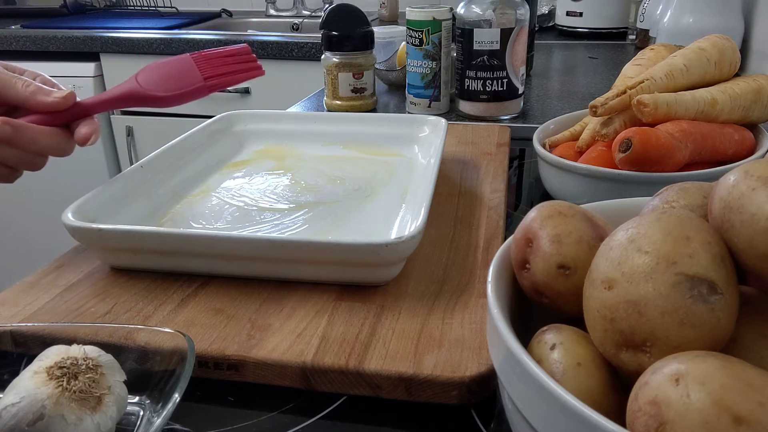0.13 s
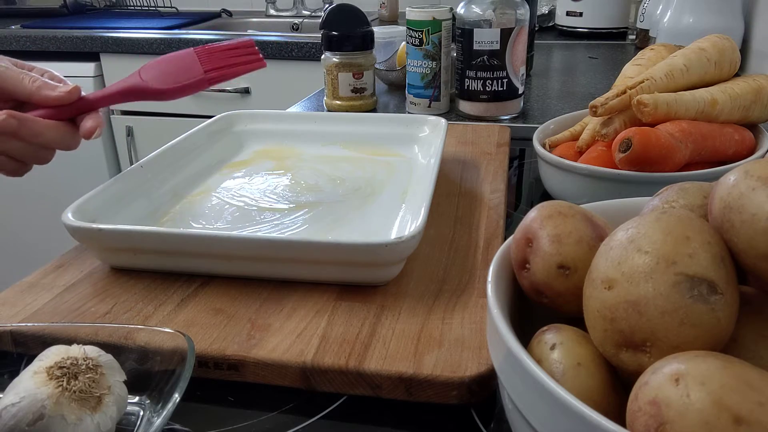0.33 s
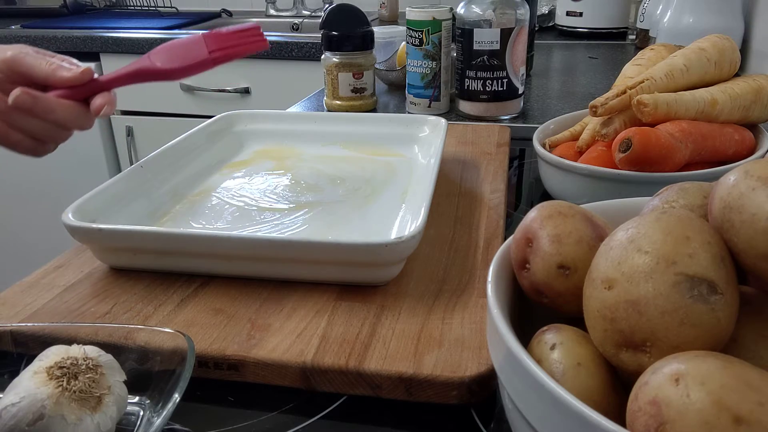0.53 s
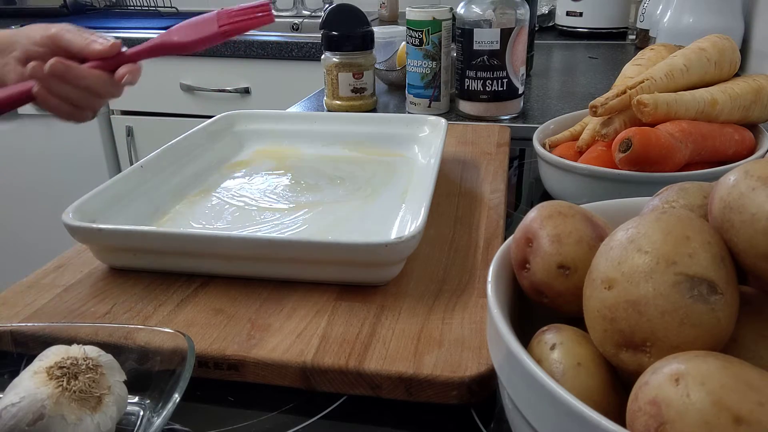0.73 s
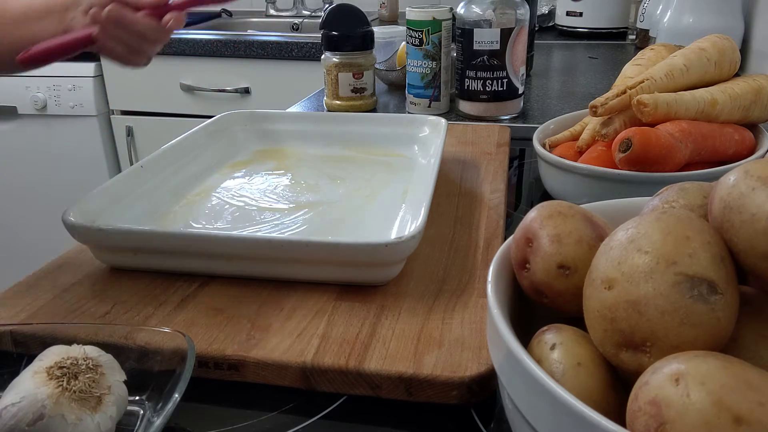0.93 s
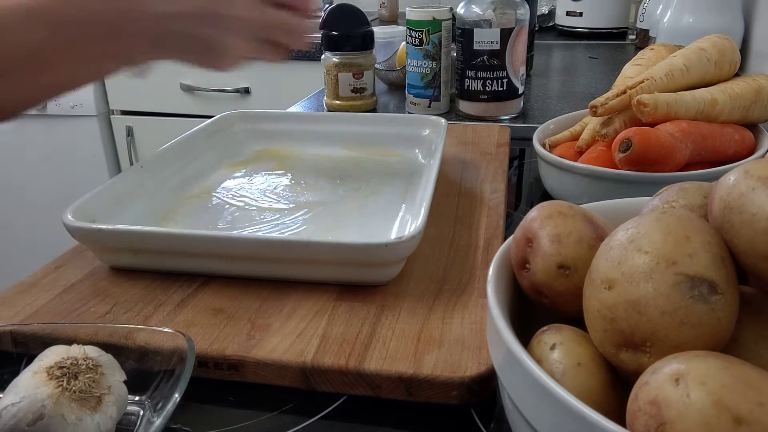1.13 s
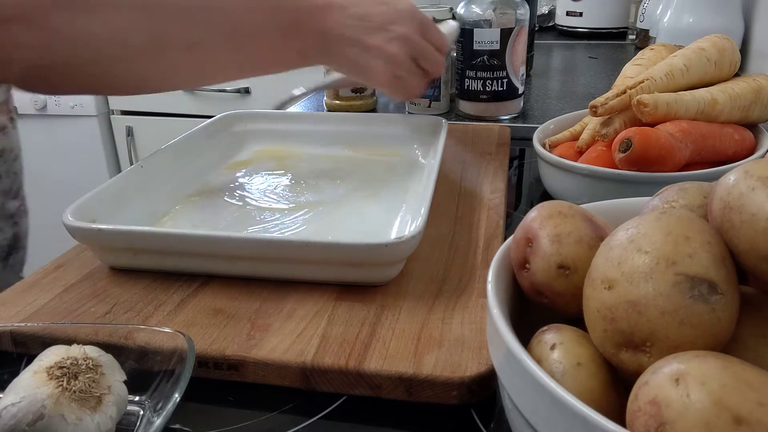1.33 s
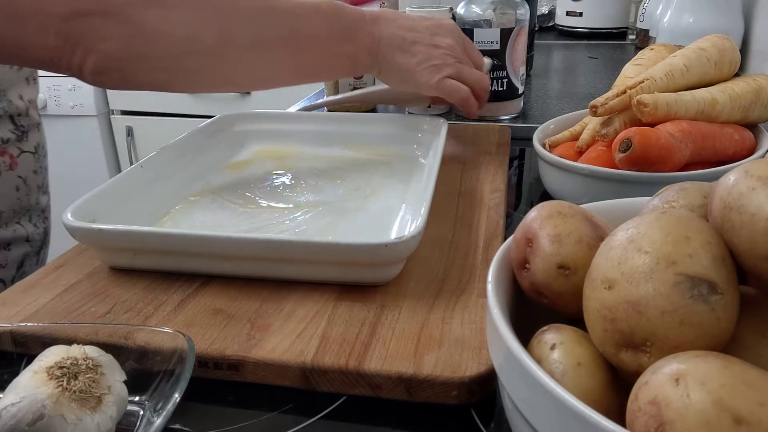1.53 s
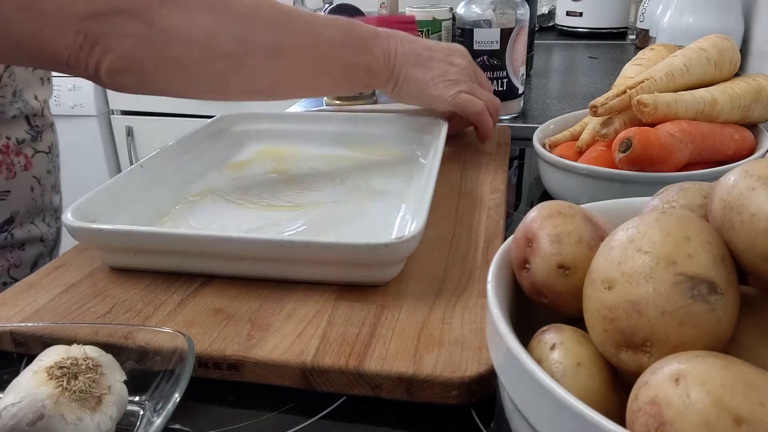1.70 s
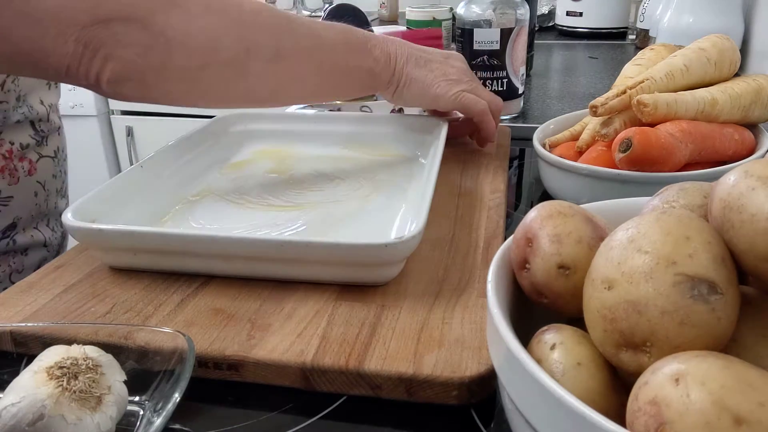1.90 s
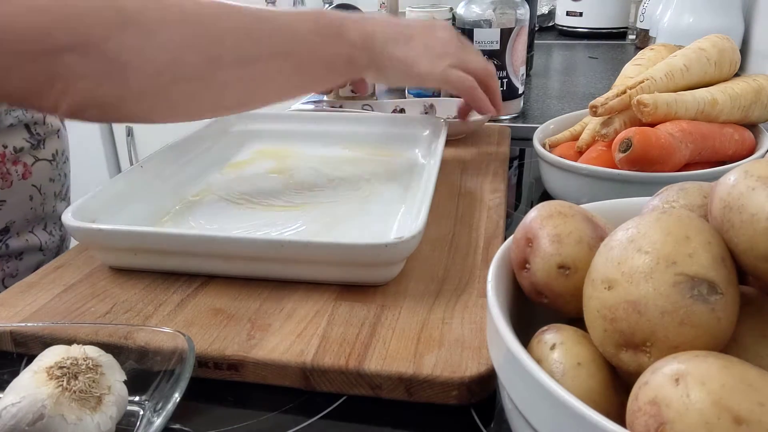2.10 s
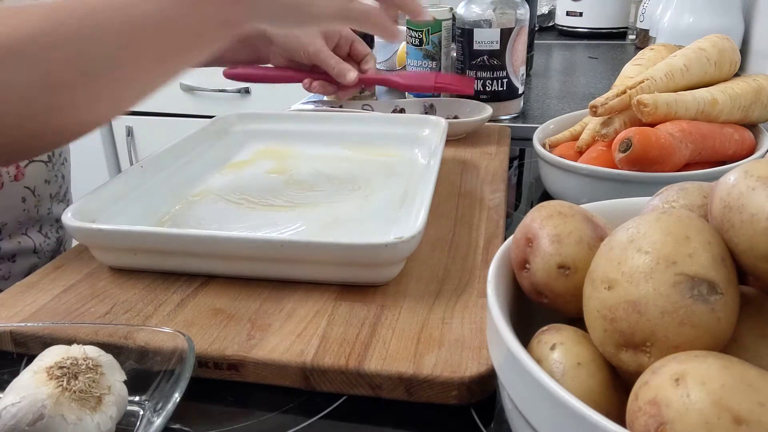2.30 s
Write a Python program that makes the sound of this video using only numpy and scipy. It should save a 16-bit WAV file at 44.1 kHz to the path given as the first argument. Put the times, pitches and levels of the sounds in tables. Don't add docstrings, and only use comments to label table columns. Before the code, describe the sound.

Hard knocks on a kitchen worktop: faint ticks and a shuffle, a loud ringing clatter at right, a pause, three brush taps on a small plate, the plate set down, soft footfalls; close stereo, fridge hum.

```python
import sys
import numpy as np
from scipy import signal
from scipy.fft import rfft, irfft, next_fast_len
from scipy.io import wavfile
from scipy.ndimage import uniform_filter1d, map_coordinates

SR = 44100
rng = np.random.default_rng(int(sys.argv[2]) if len(sys.argv) > 2 else 0)


def gain_from_db(level_db):
    decades = np.asarray(level_db, float) / 20
    return 10 ** decades


def output_pcm(signal):
    pcm = np.clip(np.atleast_2d(signal).T, -1, 1) * 32767
    wavfile.write(sys.argv[1], SR, np.round(pcm).astype(np.int16))


N = 103635
RIGHT_MS, AHEAD_MS = 0.485, 0.056


def unit(x):
    return x / np.sqrt(np.mean(x ** 2) + 1e-20)


def along(points, hz):
    f, v = np.transpose(points)
    return np.interp(np.log(hz + 1), np.log(f + 1), v)


def wobble(rate_hz):
    knots = rng.standard_normal(int(N * rate_hz / SR) + 4)
    return map_coordinates(knots, [np.arange(N) * rate_hz / SR])


def filtered(x, response):
    n = x.shape[-1]
    m = next_fast_len(n + SR // 4)
    return irfft(rfft(x, m) * response(np.fft.rfftfreq(m, 1 / SR)), m)[..., :n]


# pitch_hz, likeness [-1 to 1]
LIKENESS = [(60, 1), (240, 0.941), (950, 0.08), (3770, -0.113), (15000, -0.016)]


def rush(spectrum, patchy_db):
    z = signal.stft(rng.standard_normal((2, N)), nperseg=512)[2]
    patches = uniform_filter1d(rng.standard_normal(z.shape[1:]), size=6, axis=0)
    patches = uniform_filter1d(patches, size=10, axis=1)
    pair = signal.istft(z * gain_from_db(patchy_db * unit(patches)), nperseg=512)[1][:, :N]

    def colour_and_width(hz):
        angle = np.arccos(np.clip(along(LIKENESS, hz), -1, 1)) / 2
        return gain_from_db(along(spectrum, hz)) * np.array([np.cos(angle), np.sin(angle)])

    mid, side = filtered(pair, colour_and_width)
    return unit(np.array([mid + side, mid - side]))


# multiple of the shaft rate, level_db
FRIDGE_ORDERS = [(1, -5), (4, -2), (6, -23), (9, -2), (12, -7.5), (14, -4.5), (15, -2), (16, 2), (17, -2),
                 (18, -15), (19, -1.5), (23, -18.5)]


def fridge():
    t = np.arange(N) / SR
    shaft_hz, mains_hz = 33.69, 98.7
    orders = 0
    for multiple, level_db in FRIDGE_ORDERS:
        level = gain_from_db(level_db + 0.31 * wobble(1.43))
        phase = rng.uniform(0, np.pi) + rng.normal(0, 0.97, (2, 1))
        orders = orders + level * np.sin(2 * np.pi * multiple * shaft_hz * t + phase)
    drone_level = gain_from_db(-55 + 4.2 * wobble(8.24))
    drone = drone_level * np.sin(2 * np.pi * mains_hz * t + 2.14 * wobble(9.9))
    return gain_from_db(-61.5) * orders + drone


# start_s, level_db, brightness_db
MOVEMENTS = [(0, -60.5, -1.5), (.07, -50.5, -8.5), (.2, -59, 1), (.5, -59, -16), (.62, -60, 1.5),
             (.72, -61, 0), (.79, -65, -4), (1.1, -61, -3.5), (1.29, -66, -2.5), (1.325, -50.5, -7),
             (1.37, -52.5, -6.5), (1.43, -65.5, -3), (1.6, -65, -2.5), (2.35, -69.5, -1)]
# pitch_hz, level_db per Hz
CLOTH_COLOUR = [(500, -74), (1600, -1), (2200, 0), (4000, -1.5), (6500, -7.5), (16000, -53)]
SHEEN_COLOUR = [(4000, -45), (8000, -1), (11000, 0.5), (16000, -5.5)]


def rustle():
    start_s, *columns = np.transpose(MOVEMENTS)
    level_db, bright_db = [np.interp(np.arange(N) / SR, start_s, c) for c in columns]
    movement = gain_from_db(level_db + 1.2 * wobble(32.3))
    hiss = rush(CLOTH_COLOUR, patchy_db=0.5)
    sheen = gain_from_db(bright_db - 1) * rush(SHEEN_COLOUR, patchy_db=0.8)
    return movement * (hiss + sheen)


# pitch_hz, level_db per Hz
AIR_COLOUR = [(15, -25), (30, -4.5), (90, -2), (160, -4.5), (230, -11.5), (700, -12.5), (1100, -18),
              (16000, -51)]


def air():
    return gain_from_db(-53.5) * rush(AIR_COLOUR, patchy_db=2.5)


def pulse(tone, body, tilt_db, crack_db):
    hz = np.fft.rfftfreq(32768, 1 / SR)
    resonances = 0
    for pitch_hz, width_hz, level_db in body:
        resonances = resonances + gain_from_db(9.5 + level_db) / np.hypot(1, 2 * (hz - pitch_hz) / width_hz)
    resonances = gain_from_db(crack_db) + resonances
    colour_db = along(tone, hz) + tilt_db * np.log2((hz + 50) / 1000)
    cepstrum = irfft(np.log(np.maximum(gain_from_db(colour_db) * resonances, 1e-6)))
    cepstrum[1:16384] *= 2
    cepstrum[16385:] = 0
    p = irfft(np.exp(rfft(cepstrum)))[:16384]
    return p / np.linalg.norm(p)


# pitch_hz, t60_s
ROOM_DECAY = [(120, 0.35), (500, 0.27), (2000, 0.33), (6000, 0.37), (14000, 0.25)]


def kitchen(scatter_s, room_db, wall_db):
    n = SR // 2
    hz, t, z = signal.stft(rush([(20, 0)], patchy_db=-1)[:, :n], SR, nperseg=256)
    tail = signal.istft(z * gain_from_db(-60 * t / along(ROOM_DECAY, hz)[:, None]), SR, nperseg=256)[1][:, :n]
    tail = tail * np.clip(np.arange(n) / SR / 0.0012, 0, 1)
    f = np.fft.rfftfreq(n, 1 / SR)
    scatter_hz = 180.7
    both, left, right = [map_coordinates(k, [f / scatter_hz]) for k in rng.standard_normal((3, SR // 100))]
    alike = np.clip(along(LIKENESS, f / 3), 0, 1)
    delay = scatter_s * (np.sqrt(alike) * both + np.sqrt(1 - alike) * np.array([left, right])) ** 2
    near = irfft(np.exp(-2j * np.pi * np.cumsum(delay, axis=1) * f[1]), n)
    wall_s = .0085
    near = near + gain_from_db(wall_db) * np.roll(near[::-1], round(wall_s * SR), axis=1)
    near = near * (np.arange(n) < SR // 4)
    return near + gain_from_db(room_db) * tail / np.linalg.norm(tail[0])


def ringing(modes, tone, t):
    ring = 0
    for pitch_hz, level_db, t60_s in modes:
        excited_db = level_db + 0.2 * along(tone, pitch_hz) + rng.normal(0, 0.88, (2, 1))
        level = gain_from_db(excited_db - 60 * t / t60_s + 5.6 * wobble(62.6)[:len(t)])
        wander = pitch_hz / 3000 * wobble(53.7)[:len(t)]
        start_phase = rng.uniform(0, 2 * np.pi, (2, 1))
        ring = ring + level * np.sin(2 * np.pi * pitch_hz * t + wander + start_phase)
    return ring * (1 - np.exp(-t / 0.0018))


# pitch_hz, level_db, t60_s
DISH_MODES = [(861, 4.5, 0.29), (991, 2, .2), (2000, -10, 0.46), (2490, -5, 0.51), (2815, 2, 0.41),
              (3363, -1.5, 0.52), (3730, 5, 0.41), (3740, -3, 0.27), (4740, -3, 0.43), (5830, -12, 0.28)]


def knocks(events, tone, body, lag_ms, gain_db, modes=DISH_MODES, scatter_s=.003, room_db=-0.5,
           crack_db=0, wall_db=-16.5):
    out, t = np.zeros((2, N + SR)), np.arange(SR // 2) / SR
    lead_s = .001

    def to_ports(hz):
        delay_s = lead_s + np.array([[.5], [-.5]]) * lag_ms / 1000
        shade_db = -0.5 * lag_ms * np.array([[1], [-1]]) * np.log2(1 + hz / 500)
        return np.exp(-2j * np.pi * hz * delay_s) * gain_from_db(shade_db)

    for start_s, level_db, ring_db, tilt_db in events:
        strike = pulse(tone, body, tilt_db, crack_db)[None]
        blow = signal.fftconvolve(strike, kitchen(scatter_s, room_db, wall_db), axes=1)[:, :len(t)]
        both = gain_from_db(13 + gain_db) * blow + gain_from_db(ring_db - 8.5) * ringing(modes, tone, t)
        i = round((start_s - lead_s) * SR)
        out[:, i:i + len(t)] += gain_from_db(level_db) * filtered(both, to_ports)
    return out[:, :N]


# start_s, level_db, ring_db, tilt_db per octave
TICK_HITS = [
    (0.0187, -44.5, -24, 0.1),
    (0.0886, -42, -11, 0.1),
    (0.1433, -43.5, -34, 0.1),
]
# pitch_hz, level_db per Hz
TICK_COLOUR = [(800, -39), (3500, -10), (5000, -3), (7000, -5), (13000, -3.5), (16000, -14)]


def ticks():
    return knocks(TICK_HITS, TICK_COLOUR, [], RIGHT_MS, gain_db=5.0)


# start_s, level_db, ring_db, tilt_db per octave
SHUFFLE_HITS = [
    (.02, -39.5, -50, 0.44),
    (.053, -38, -44, 6.3),
    (.068, -40, -38, 4),
    (.1, -50, -29, 0.046),
    (.152, -39.5, -38, 2.1),
]
# pitch_hz, level_db per Hz
THUD_COLOUR = [(60, -25), (150, 4.5), (260, -0.5), (550, -1.5), (1200, -19.5), (3000, -60)]
# pitch_hz, width_hz, level_db
SHUFFLE_RESONANCES = [(360, 21, 4.5), (820, 46, -3), (1355, 45, 14)]


def shuffle():
    return knocks(SHUFFLE_HITS, THUD_COLOUR, SHUFFLE_RESONANCES, RIGHT_MS, gain_db=7.5, modes=[])


# start_s, level_db, ring_db, tilt_db per octave
SCUFF_HITS = [
    (.203, -44, -44, 0),
    (.207, -37.5, -34, -1),
    (.213, -38.5, -40, 0.5),
    (.222, -47, -34, -3),
]
# pitch_hz, level_db per Hz
TAP_COLOUR = [(47, -30), (80, -6.5), (167, 1.5), (528, -1), (638, -6.5), (1470, -4), (2240, -12),
              (3410, -10), (12000, -35), (15600, -89), (22000, -120)]
# pitch_hz, width_hz, level_db
SCUFF_RESONANCES = [(297, 16, 1.8), (623, 68, 1.6), (1940, 160, 2)]


def scuff():
    return knocks(SCUFF_HITS, TAP_COLOUR, SCUFF_RESONANCES, RIGHT_MS, gain_db=12)


# start_s, level_db, ring_db, tilt_db per octave
BUMP_HITS = [
    (0.241, -16, -19.5, -0.46),
    (.2455, -18, -30, -1.15),
]
# pitch_hz, level_db per Hz
CLATTER_COLOUR = [(50, -21), (100, -8.5), (250, -9), (1000, -7), (1460, -15), (2080, -7.5), (12800, -17),
                  (16000, -36)]
# pitch_hz, width_hz, level_db
BUMP_RESONANCES = [(98, 14, 2.7), (278, 22, 9.7), (397, 17, 7.7), (597, 20, 3), (777, 45, 5.3),
                   (1007, 50, 3.6), (2030, 26, 1.7), (2340, 97, 1.2), (3710, 31, 8), (4740, 40, 1.2)]


def bump():
    return knocks(BUMP_HITS, CLATTER_COLOUR, BUMP_RESONANCES, RIGHT_MS, gain_db=5.0, crack_db=-0.5)


# start_s, level_db, ring_db, tilt_db per octave
CLATTER_HITS = [
    (0.305, -8, -26.5, 0.38),
    (.3075, -12.5, -29.5, -0.2),
    (.327, -28, -23, -2),
]
# pitch_hz, width_hz, level_db
CLATTER_RESONANCES = [(205, 33, 11), (296, 27, 3), (357, 20, 8.5), (570, 10.7, 12.5), (982, 44, 7.5),
                      (2050, 78, 5.5), (2330, 150, 4), (3170, 81, 6), (3790, 67, 3.5), (3950, 130, 1),
                      (4880, 73, 5.5), (6030, 92, 3), (7860, 300, -4.5), (11930, 460, -6.5)]
# pitch_hz, level_db, t60_s
CUPBOARD_MODES = [(258.8, 4, 1), (297, -1, 0.47)]


def clatter():
    return knocks(CLATTER_HITS, CLATTER_COLOUR, CLATTER_RESONANCES, RIGHT_MS, gain_db=3.0,
                  modes=DISH_MODES + CUPBOARD_MODES, crack_db=-1)


# start_s, level_db, ring_db, tilt_db per octave
CLINK_HITS = [
    (0.345, -13.5, -20.5, 0.092),
]
# pitch_hz, level_db per Hz
CLINK_COLOUR = [(120, -17), (300, -9), (700, -20), (1300, -6.5), (2000, 1), (4000, -3), (5000, -4.5),
                (6500, -8), (13000, -12), (16000, -40)]
# pitch_hz, width_hz, level_db
CLINK_RESONANCES = [(307, 43, 10.5), (590, 17, -10), (1375, 69, 7.5), (4040, 60, 7.5), (4900, 110, 6),
                    (13200, 510, -11)]


def clink():
    return knocks(CLINK_HITS, CLINK_COLOUR, CLINK_RESONANCES, RIGHT_MS, gain_db=3.5)


# start_s, level_db, ring_db, tilt_db per octave
TAP_HITS = [
    (1.499, -24, -20.5, 0.01),
    (1.595, -19, -16.5, 1.1),
    (1.634, -31, -28, 1.8),
]
# pitch_hz, width_hz, level_db
TAP_RESONANCES = [(166, 19, 9), (325, 29, -3.5), (870, 45, 0), (1447, 123, 10), (1680, 66, 5.5),
                  (2080, 41, -3), (2400, 80, 4), (2730, 110, 9), (3343, 17, 2), (3900, 69, 0),
                  (4830, 270, -3)]
# pitch_hz, level_db, t60_s
PLATE_MODES = [(750, -3, 0.5), (860, 3, 0.45), (1215, 4, 0.16), (1480, -14, 0.15), (2018, 4, 0.39),
               (2423, 4.5, 0.47), (2795, -2, 0.26), (3360, 1.5, 0.43), (3790, -0.5, 0.37), (4880, -7, 0.39),
               (6060, -7, .2), (6200, -18, 0.22)]


def taps():
    return knocks(TAP_HITS, TAP_COLOUR, TAP_RESONANCES, AHEAD_MS, gain_db=4.5, modes=PLATE_MODES,
                  scatter_s=0.000817, room_db=0.0, crack_db=-16, wall_db=-5.5)


# start_s, level_db, ring_db, tilt_db per octave
SET_DOWN_HITS = [
    (1.7925, -15, -21.5, -0.16),
    (1.7945, -16, -23, -0.5),
    (1.7985, -20.5, -37, 0.5),
    (1.803, -26.5, -22, 3.5),
]
# pitch_hz, level_db per Hz
SET_DOWN_COLOUR = [(35, -59), (60, -9), (215, -10.5), (364, -6.5), (437, -11.5), (721, -1.5), (2420, -8.5),
                   (2770, -15.5), (14000, -40)]
# pitch_hz, width_hz, level_db
SET_DOWN_RESONANCES = [(169, 21.5, 17), (348, 32, 2), (625, 17, 2.3), (897, 34, 6.2), (1210, 77, 8.8),
                       (1820, 124, 10.5), (1950, 37, 4.7), (2490, 44, 7.5), (3370, 60, 16), (3740, 67, 4),
                       (4880, 100, 1.9)]


def set_down():
    return knocks(SET_DOWN_HITS, SET_DOWN_COLOUR, SET_DOWN_RESONANCES, -AHEAD_MS, gain_db=6.5,
                  modes=PLATE_MODES, scatter_s=0.000898, room_db=-1.5, crack_db=1.5, wall_db=-7.5)


# start_s, level_db, ring_db, tilt_db per octave
FOOT_HITS = [
    (2.135, -33, -28, -2.3),
    (2.148, -34.5, -30, -5.5),
    (2.208, -33, -22, -4.5),
    (2.241, -41.5, -38.5, -11),
    (2.255, -45.5, -38, -2),
    (2.283, -44, -40, -2),
]


def feet():
    return knocks(FOOT_HITS, THUD_COLOUR, [], AHEAD_MS, gain_db=1.0, modes=[], scatter_s=0.000275, room_db=-1)


def scene():
    right = clatter() + bump() + clink() + scuff() + ticks()
    ahead = taps() + set_down() + feet()
    return right + (ahead + shuffle()) + fridge() + rustle() + air()


def roll_off(x):
    return signal.sosfilt(signal.butter(12, 16610, fs=SR, output="sos"), x)


# pitch_hz, left over right level_db
PORT_COLOUR = [(60, 3.5), (200, 3), (500, 1), (4000, 1.5), (9000, 0), (15000, -5.5)]


def record(dry):
    def ports(hz):
        balance_db = along(PORT_COLOUR, hz) * np.array([[.5], [-.5]])
        return gain_from_db(balance_db) * (hz < 16500)

    return roll_off(filtered(dry, ports))


dry = scene()
out = record(dry)
output_pcm(out)
```